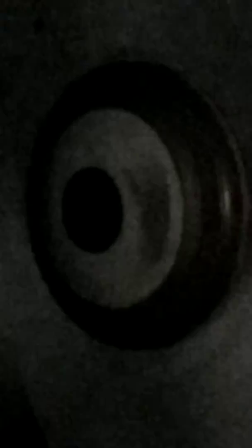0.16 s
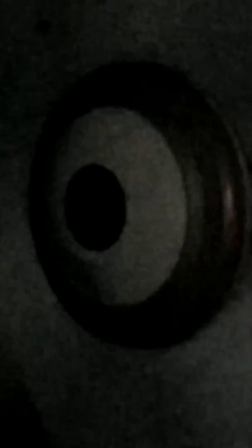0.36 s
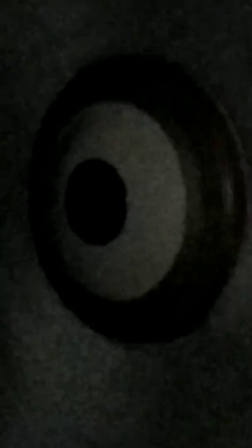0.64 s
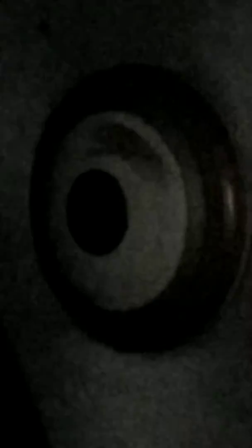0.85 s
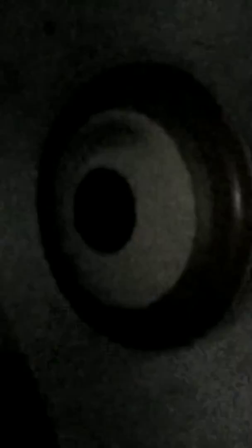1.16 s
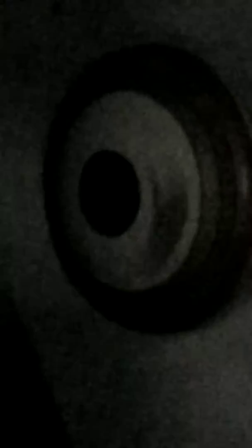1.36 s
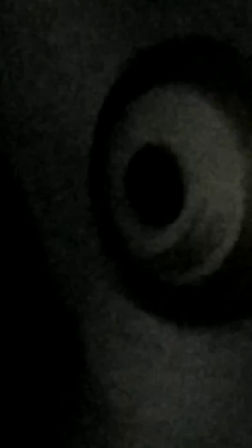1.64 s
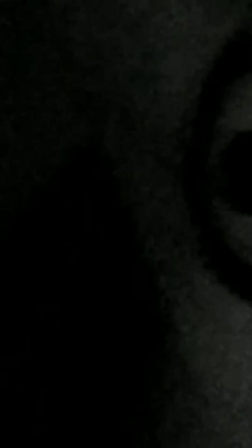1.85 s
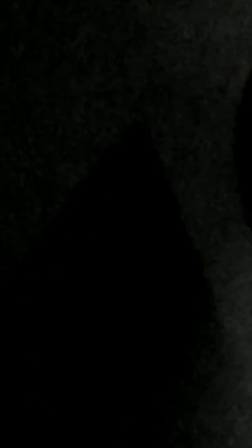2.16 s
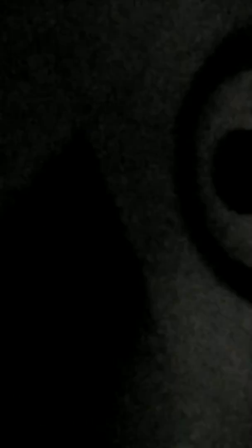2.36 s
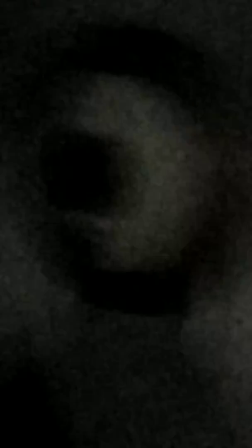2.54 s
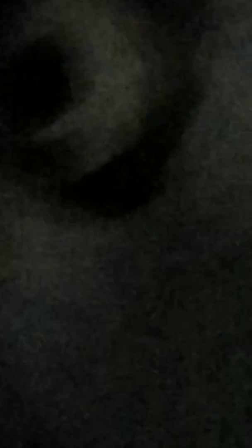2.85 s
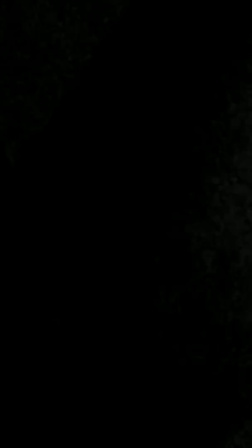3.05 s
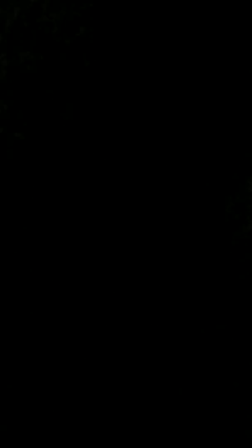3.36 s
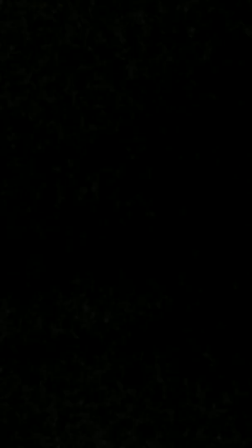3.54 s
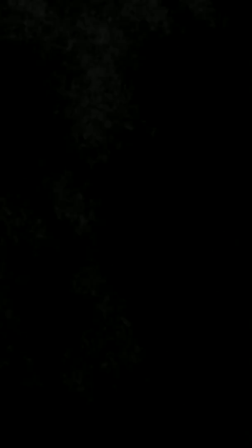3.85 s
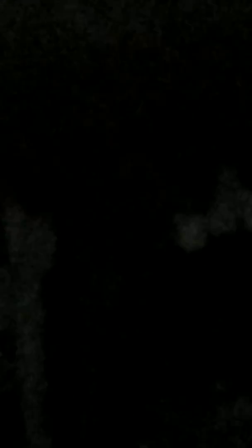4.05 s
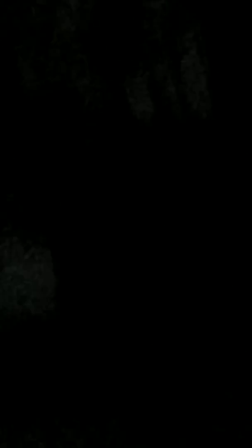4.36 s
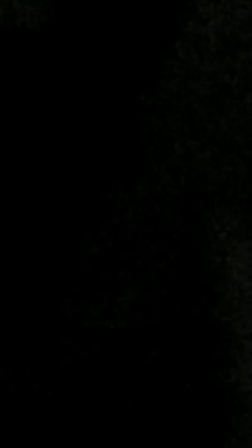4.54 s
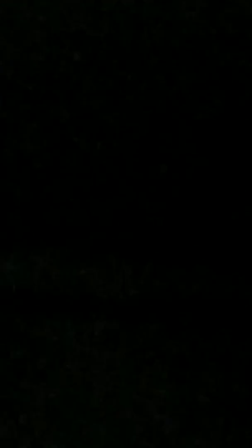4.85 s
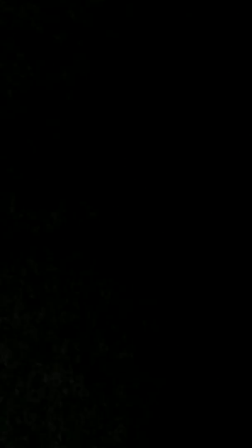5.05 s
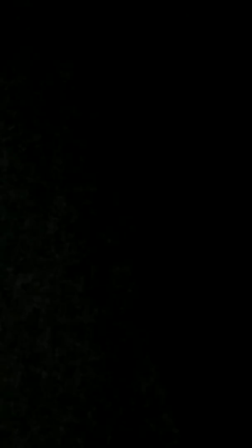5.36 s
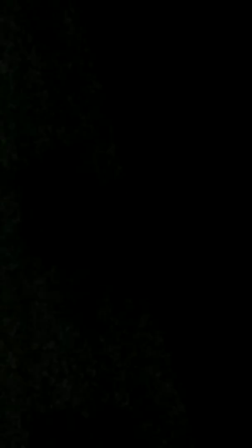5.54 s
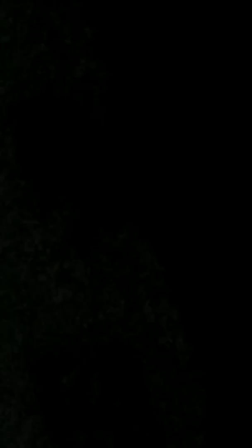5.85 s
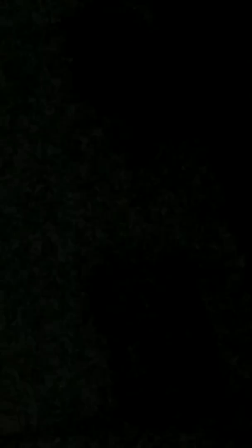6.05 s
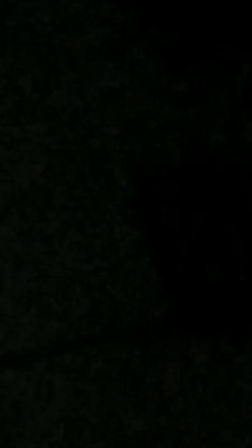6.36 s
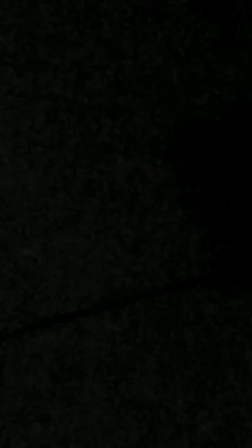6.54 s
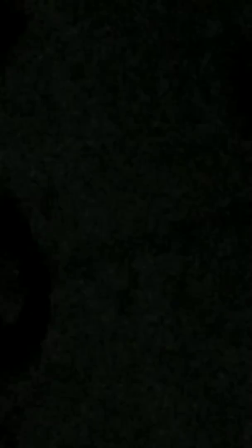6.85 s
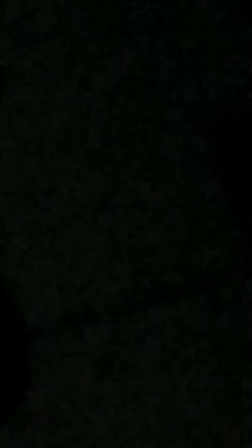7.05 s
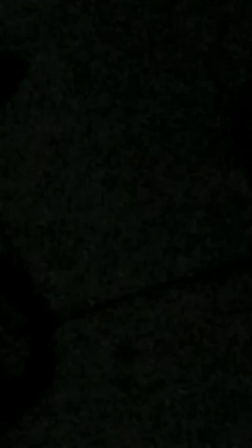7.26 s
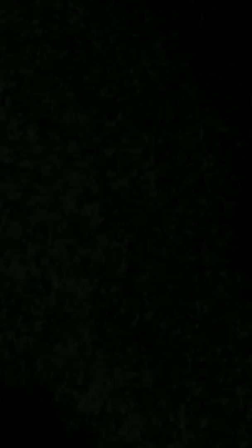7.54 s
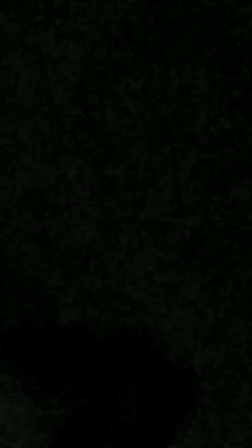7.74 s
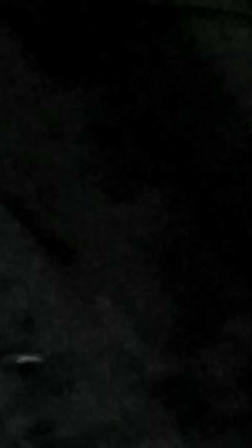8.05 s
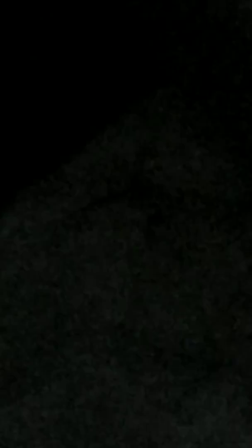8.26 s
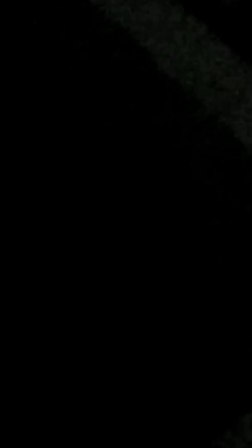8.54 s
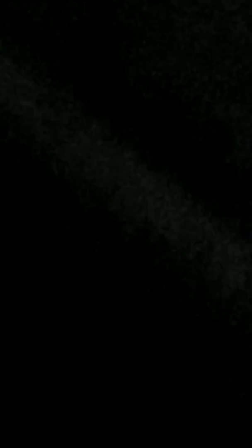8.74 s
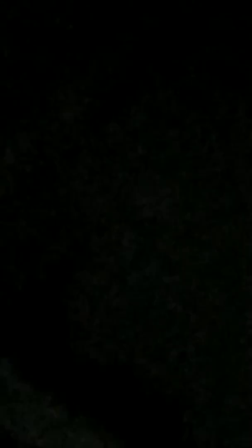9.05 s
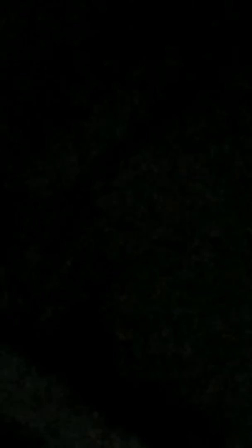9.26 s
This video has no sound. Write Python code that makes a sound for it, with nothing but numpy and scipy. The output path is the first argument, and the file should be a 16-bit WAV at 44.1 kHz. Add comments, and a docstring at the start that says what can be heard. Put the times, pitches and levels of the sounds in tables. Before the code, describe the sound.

A small electric fan whirs steadily close by in a quiet room, low and airy with a fluttering hum. The handheld phone microphone picks up thuds and finger clicks, busiest in the first three seconds with two hard snaps, then mostly muffled rumbling from a shifting grip, and a few more clicks and bumps near the end.

```python
"""An electric fan whirs in a quiet room: shaped noise for its turbulent air, over a sine at blade-passing rate.
Someone carries a phone near it; a hand fidgets, bumps and shifts its grip as low rumble and decaying sines.
Finger clicks excite case resonances with a short room tail; rubs, and soft hiss around some clicks, are
swells of band-passed noise. Narrow noises and arcing tones make faint whines. A noise suppressor holds the
treble down until a band rises out of its floor, so the hiss comes up for a moment after louder sounds."""
import sys
import numpy as np
from scipy import signal
from scipy.fft import rfft, irfft
from scipy.io import wavfile
from scipy.ndimage import uniform_filter1d

SR = 44100
rng = np.random.default_rng(int(sys.argv[2]) if len(sys.argv) > 2 else 0)


def materialize(psi):
    """Save the field psi as 16-bit PCM at rate SR to the path in sys.argv[1].

    A 1-D psi becomes a single channel; in a 2-D psi each row is a channel.
    """
    bounded = np.clip(np.atleast_2d(psi).T, -1, 1)
    quanta = np.round(bounded * 32767).astype(np.int16)
    wavfile.write(sys.argv[1], SR, quanta)


N = 414540
TIME = np.arange(N) / SR


def undb(db):
    """Decibel definition: an amplitude gain is ten to the power db / 20."""
    return 10 ** (np.asarray(db) / 20)


def unit(x):
    """Normalisation: scale to rms 1."""
    return x / np.sqrt(np.mean(x ** 2))


def curves(table):
    """Linear interpolation: each column after start_s as one value per sample."""
    start_s, *columns = np.transpose(table)
    return [np.interp(TIME, start_s, column) for column in columns]


def at_hz(points, hz):
    """Logarithmic frequency scale: read (frequency, value) points between their marks."""
    point_hz, value = np.transpose(points)
    return np.interp(np.log(np.maximum(hz, 1)), np.log(point_hz), value)


def shape(x, gain):
    """Linear filtering: multiply the spectrum by a gain given as a function of frequency."""
    return irfft(rfft(x) * gain(np.fft.rfftfreq(N, 1 / SR)), N)


def noise(colour, channels=2):
    """Coloured noise: uncorrelated white noises filtered to a given spectrum."""
    white = rng.standard_normal((channels, N))
    return unit(shape(white, lambda f: undb(at_hz(colour, f))))


def band(hz, width_hz):
    """Narrow-band noise: two uncorrelated noises around one pitch."""
    white = rng.standard_normal((2, N))
    return unit(shape(white, lambda f: 1 / (1 + ((f - hz) / width_hz) ** 2) ** 2))


def walk(rate_hz):
    """Random modulation: low-passed noise of rms 1 that wanders up to about rate_hz."""
    return unit(shape(rng.standard_normal(N), lambda f: 1 / (1 + (f / rate_hz) ** 4)))


def pan(left_minus_right_db):
    """Interchannel level difference: left and right gains with a mean of 1."""
    left = np.atleast_1d(undb(left_minus_right_db))
    return 2 * np.array([left, np.ones_like(left)]) / (1 + left)


def swell(peak_s, rise_s, fall_s):
    """Gaussian envelope: a rounded rise to 1 and a rounded fall, each with its own spread."""
    spread_s = np.where(TIME < peak_s, rise_s, fall_s)
    return np.exp(-0.5 * np.minimum(((TIME - peak_s) / spread_s) ** 2, 10 ** 2))


def add(out, start_s, sound):
    """Superposition: mix a sound in at its start time."""
    i = int(start_s * SR)
    out[:, i:i + sound.shape[-1]] += sound[..., :N - i]


# spectrum of the fan's air before its bass roll-off: frequency_hz, density_db (relative, per Hz)
AIR_COLOUR = [(35, -16), (100, -1), (135, -7), (170, -9), (230, -19), (255, -12.5), (310, -12.5),
              (355, -21), (395, -15), (540, -22), (605, -19.5), (680, -24), (900, -22), (1200, -24.5),
              (1420, -23.5), (1700, -34), (2100, -62), (3800, -120)]
# correlation of the air noise at the two microphones: frequency_hz, correlation (0-1)
AIR_LIKENESS = [(60, 0.38), (130, 0.078), (290, 0.8), (640, 0.83), (1400, 0.012), (3000, 0.25)]
# the fan as heard from the moving phone: start_s, relative_level_db, upper_gain_db, left_minus_right_db
FAN_PATH = [(0.0, -54, -10, 2), (1.18, -54.5, -0.5, 1), (1.83, -54, -6, 0.5), (2.22, -53, -4.5, 1),
            (3.14, -55.5, 1, 1), (4.34, -55.5, -1, 4.5), (4.55, -52.5, -3, 0.5), (5.47, -54.5, -2, 1.5),
            (6.54, -53, 0.5, 1), (6.94, -55.5, 0.5, 1), (7.59, -54, 0.5, 1), (9.4, -55, 3, 2.5)]
# gain of the top of the whir, which comes and goes: start_s, gain_db
WHIR_TOP = [(0, -19), (.7, 2), (.85, 0), (1.2, -9), (1.8, -16), (2.2, -4), (2.9, -5.5), (3.2, -17),
            (3.5, 11), (6.5, 5.5), (9.4, 4)]


def fan(shaft_hz=20.2, throb=0.11, blade_hz=104.1, blade_db=-53, waver_db=4.0):
    """Aerodynamic noise: turbulent air throbs once a turn over a wavering blade-passing tone."""
    flicker_db, air_db, bass_edge_hz, upper_hz, top_hz = 2.0, 7.0, 150, 900, 1500
    level_db, upper_db, pan_db = curves(FAN_PATH)
    mid, side = noise(AIR_COLOUR)
    # more mid than side where the two microphones hear alike
    mid = shape(mid, lambda f: np.sqrt(1 + np.clip(at_hz(AIR_LIKENESS, f), 0, 1)))
    side = shape(side, lambda f: np.sqrt(1 - np.clip(at_hz(AIR_LIKENESS, f), 0, 1)))
    air = np.array([mid + side, mid - side])
    air = shape(air, lambda f: 1 / np.sqrt(1 + (bass_edge_hz / (f + 1)) ** 2))
    upper = shape(air, lambda f: 1 / (1 + (upper_hz / (f + 1)) ** 4))
    upper_gain = undb(upper_db + flicker_db * walk(20.3))
    air = unit(air + upper * (upper_gain - 1)) * undb(level_db + air_db)
    top_gain_db, = curves(WHIR_TOP)
    top = shape(air, lambda f: 1 / (1 + (top_hz / (f + 1)) ** 16))
    air += top * (undb(top_gain_db) - 1)
    air += undb(-59.5) * band(730, 160)  # grille
    # phase of a slightly unsteady 1 Hz rotation, scaled to each pitch below
    turn = 2 * np.pi * np.cumsum(1 + 0.0024 * walk(2.4)) / SR
    air *= (1 + throb * np.sin(shaft_hz * turn)) * pan(pan_db)
    hum = np.sqrt(2) * np.sin(blade_hz * turn) * undb(blade_db + waver_db * walk(6.0))
    return air + hum * pan(1.5)


# spectrum of the handling rumble: frequency_hz, density_db (relative, per Hz)
RUMBLE_COLOUR = [(25, -40), (38, -7), (55, -0.5), (80, 4), (125, 3), (180, -5), (300, -20.5), (600, -69.5)]
# the hand rests lightly at first, then holds more restlessly: start_s, rumble_level_db
RESTLESS = [(0, -53), (1.9, -66), (2.3, -62.5), (3.4, -49.5), (4.3, -50.5), (5.6, -50.5), (7.2, -48),
            (9.4, -52)]
# shifts of the grip, each a short swell of rumble: peak_s, half_length_s, level_db, left_minus_right_db
GRIPS = [(0.12, 0.02, -41, 15), (0.304, 0.022, -34, 24), (2.277, 0.11, -40, 5), (3.058, 0.029, -42.5, 17.5),
         (4.24, 0.01, -37, -26), (4.37, 0.079, -37.5, 15), (4.528, 0.022, -34.5, -24),
         (4.687, 0.019, -37, -15), (5.151, 0.022, -50.5, 14), (5.256, 0.012, -37, 4),
         (6.018, 0.029, -41, 13), (6.853, 0.012, -38.5, -21.5), (7.27, 0.022, -42.5, 18),
         (7.596, 0.016, -50, 10), (7.85, 0.045, -42.5, 6), (8.277, 0.031, -44, 20), (8.78, 0.016, -38, 26),
         (9.272, 0.05, -42.5, 0)]
# soft bumps of the hand on the case: start_s, level_db, pitch_hz, t60_s, left_minus_right_db
BUMPS = [(.304, -44, 84.6, 0.038, 12), (.322, -17, 130, 0.023, 20), (0.398, -29, 112, 0.087, 13),
         (2.201, -40.5, 292, 0.033, 9), (2.209, -24.5, 114.3, 0.045, 12),
         (2.5422, -18, 297.6, 0.037, -29.5), (2.946, -25, 88, 0.043, 21), (4.509, -29.5, 83, 0.064, 5),
         (5.99, -31.5, 95, 0.086, 22), (7.211, -27.5, 97, 0.093, 21), (8.731, -17.5, 75.4, 0.032, 12),
         (8.827, -29, 95, 0.1, 15), (9.233, -21, 99, 0.055, 21), (9.273, -21.5, 84, 0.045, 18)]


def ring(hz, t60_s, length_s=0.13):
    """Damped oscillation: a sine that falls by 60 dB in t60_s."""
    t = TIME[:int(length_s * SR)]
    return np.sin(2 * np.pi * hz * t) * np.exp(-np.log(1000) * t / t60_s)


def handling(fidget_db=3.0, fidget_hz=6, apart=0.5, left_db=2.0):
    """Structure-borne sound: fidgeting and grip shifts rumble through the case, and bumps ring it."""
    rest_db, = curves(RESTLESS)
    mid, side = noise(RUMBLE_COLOUR)
    pressure = undb(rest_db + fidget_db * walk(fidget_hz)) * pan(left_db)
    for peak_s, half_s, level_db, pan_db in GRIPS:
        grip = undb(level_db) * swell(peak_s, half_s, half_s) * pan(pan_db)
        pressure = np.hypot(pressure, grip)  # unrelated sounds add in power
    out = unit(np.array([mid + apart * side, mid - apart * side])) * pressure
    for start_s, level_db, pitch_hz, t60_s, pan_db in BUMPS:
        add(out, start_s, undb(level_db) * ring(pitch_hz, t60_s) * pan(pan_db))
    return out


# spectrum of the hiss with the suppressor open: frequency_hz, density_db (relative, per Hz)
HISS_COLOUR = [(800, 5.5), (1600, 9.5), (2000, 5.5), (2700, 5), (3200, 0.5), (4300, 3), (5600, 1.5),
               (6300, 0), (7500, 0), (8500, -13), (12000, -7.5), (15500, -15.5)]
# drift of the hiss before suppression: start_s, level_db
HISS_LEVEL = [(0, -55), (2.5, -53.5), (3.6, -57.5), (4.6, -56), (5.4, -55.5), (6.6, -54), (7.4, -55),
              (9.4, -54)]


def hiss(left_db=7.0):
    """Microphone self-noise: uncorrelated coloured noise whose level drifts."""
    level_db, = curves(HISS_LEVEL)
    return undb(level_db) * noise(HISS_COLOUR) * pan(left_db)


# the motor's whine comes and goes: start_s, level_db
MOTOR_LEVEL = [(0, -75), (.35, -76), (.6, -75), (1.3, -69.5), (1.7, -76.5), (2.7, -76), (3.05, -71.5),
               (3.3, -96), (3.5, -73.5), (5, -76.5), (6.1, -70), (9.4, -71)]


def motor(hz=2228, width_hz=90, waver_db=4.0, pan_db=-14):
    """Amplitude modulation: the fan motor's thin whine is wavering narrow noise, mostly on the right."""
    level_db, = curves(MOTOR_LEVEL)
    return undb(level_db + waver_db * walk(6)) * band(hz, width_hz) * pan(pan_db)


# continuous faint electronic whines that flutter and pulse:
# pitch_hz, width_hz, level_db, flutter_db, pulse_depth (0-1), left_minus_right_db
WHINES = [(2820, 37, -88.5, 3.5, 0.2, -6.5), (3650, 70, -89, 3, 0.1, -0.5), (6700, 110, -65, 2.5, .12, 4.5),
          (6900, 240, -74.5, 2, .12, -5)]
# even runs of bursts of a higher whine, near one of two pitches: first_burst_s, last_burst_s, pitch_hz
WHINE_RUNS = [(0.15, 1.4, 10120), (0.19, .46, 9720), (1.642, 1.93, 10000), (2.247, 2.84, 10300),
              (3.093, 3.68, 9800), (3.972, 4.6, 10300), (4.907, 6.72, 9810), (6.398, 7.33, 10330),
              (7.507, 9.03, 9710), (8.416, 8.72, 10320)]


def whine(pulse_hz=12.0, burst_every_s=0.3077, burst_half_s=0.12, burst_db=-74.5, burst_pan_db=-11):
    """Amplitude and frequency modulation: low whines flutter and pulse, a high one repeats in arcs."""
    blur_hz, flutter_db, bend_hz, scatter_hz, scatter_db = 180, 2.5, -130, 55, 2
    pulse = np.sin(2 * np.pi * np.cumsum(pulse_hz * (1 + 0.17 * walk(2.4))) / SR)
    out = np.zeros((2, N))
    for hz, width_hz, level_db, waver_db, depth, pan_db in WHINES:
        gain = undb(level_db + waver_db * walk(36.0)) * (1 + depth * pulse)
        out += gain * band(hz, width_hz) * pan(pan_db)
    # a complex random envelope widens the pitch into a narrow band
    blur = (walk(blur_hz) + 1j * walk(blur_hz)) * undb(flutter_db * walk(3.3))
    for first_s, last_s, hz in WHINE_RUNS:
        for burst_s in np.arange(first_s, last_s + burst_every_s / 2, burst_every_s):
            near = np.abs(TIME - burst_s) < 2 * burst_half_s
            u = (TIME[near] - burst_s) / burst_half_s
            pitch_hz = hz + scatter_hz * rng.standard_normal() + bend_hz * u ** 2
            phase = 2 * np.pi * np.cumsum(pitch_hz) / SR
            burst = np.real(blur[near] * np.exp(1j * phase)) * np.exp(-u ** 4)
            gain = undb(burst_db + scatter_db * rng.standard_normal())
            out[:, near] += gain * burst * pan(burst_pan_db)
    return out


def minimum_phase(gain):
    """Minimum phase: folding the cepstrum gives the quickest causal response with this spectrum."""
    cepstrum = irfft(np.log(gain + 1e-9))
    half = len(cepstrum) // 2
    cepstrum[1:half] *= 2
    cepstrum[half + 1:] = 0
    return irfft(np.exp(rfft(cepstrum)))


# resonances of the phone case and microphone port: pitch_hz, undamped_width_hz, relative_level_db
CASE = [(810, 1550, 0.5), (2620, 1100, 0), (3930, 1800, 0.5), (5640, 2300, -0.5), (12400, 4500, -1)]
# finger clicks: start_s, five relative levels_db (one per case resonance),
# damping by the finger (factor on the widths), left_minus_right_db
CLICKS = [(.052, -49.5, -66, -69, -72, -81.5, 0.44, 8), (0.343, -74, -64, -78, -70, -63, 1.4, 22),
          (0.3937, -38, -46.5, -45.5, -70, -85, 0.83, 43), (0.9108, -59, -37.5, -61, -47.5, -56, 1.35, 44),
          (1.034, -72.5, -69.5, -70, -55, -59, 1.2, 25), (1.0624, -44.5, -37.5, -70, -43.5, -70, 0.74, 39),
          (1.07, -56, -52, -71, -46.5, -52, 1.2, 31), (1.6828, -47.5, -36, -64, -46.5, -57.5, 0.76, 48),
          (1.768, -74, -65.5, -68, -49.5, -68.5, 0.73, 25), (1.803, -47, -56, -69, -57.5, -58.5, .9, 27),
          (1.8406, -41, -27.5, -60.5, -20.5, -35, 0.75, 26), (1.8667, -46, -43, -62, -46.5, -43, 2, 26),
          (1.9224, -60, -34.5, -56, -41.5, -51, 0.71, 31), (2.0058, -63, -41.5, -61, -42.5, -51, 1.0, 46),
          (2.143, -63.5, -46.5, -43, -41, -43, 0.76, 40), (2.1434, -59, -37.5, -38, -38.5, -48, 0.95, 50),
          (2.1999, -30, -26, -30.5, -22.5, -28, 1.6, 22), (2.2143, -57, -56, -53, -37.5, -35, 1.3, 24),
          (2.5394, -23.5, -28.5, -33, -31, -24.5, 1.8, 10), (2.5406, -30.5, -27, -27, -14, -24, 1.2, 14.5),
          (2.9362, -64, -51.5, -67, -39.5, -46.5, 1.5, 40), (3.189, -59, -42.5, -71.5, -48, -88, 0.36, 22),
          (6.466, -87, -69, -56.5, -54, -65.5, 0.57, 7), (7.7533, -50, -54, -51, -49, -63, 0.93, 7.5),
          (7.758, -38, -47, -38.5, -31.5, -42.5, 0.55, 41), (8.1495, -50, -59, -58, -56, -64, .9, 14),
          (8.1567, -39, -47, -43, -35.5, -52.5, 0.52, 38), (9.232, -70, -52, -51, -46.5, -45, 2.18, 35)]


def clicks(crunch=0.11, crunch_s=0.0012):
    """Impulse excitation: a snap and its crunch ring the case, more briefly where the finger damps it."""
    out = np.zeros((2, N))
    t = TIME[:SR // 200]
    f = np.fft.rfftfreq(1024, 1 / SR) + 1
    grits = rng.standard_normal((len(CLICKS), len(t)))
    for (start_s, *levels_db, damping, pan_db), grit in zip(CLICKS, grits):
        contact = crunch * grit * np.exp(-t / crunch_s)
        contact[0] += 1  # the snap
        power = np.zeros(len(f))
        for (hz, width_hz, case_db), level_db in zip(CASE, levels_db):
            resonance = 1 / (1 + ((f - hz ** 2 / f) / (width_hz * damping)) ** 2)
            power += (undb(level_db + case_db) * unit(resonance)) ** 2
        click = np.convolve(unit(contact), minimum_phase(np.sqrt(power)))
        add(out, start_s, click * pan(pan_db))
    return out


def room(x, t60_s=0.84, wet_db=-28, gap_s=0.0016):
    """Diffuse reverberation: convolve with a short decaying noise that builds up over about gap_s."""
    t = TIME[:SR // 2]
    decay = np.exp(-np.log(1000) * t / t60_s) * (1 - np.exp(-t / gap_s))
    tail = rng.standard_normal((2, len(t))) * decay
    tail /= np.sqrt(np.sum(tail ** 2, axis=1, keepdims=True))
    return x + undb(wet_db) * signal.fftconvolve(x.mean(axis=0, keepdims=True), tail, axes=1)[:, :N]


# finger rubs, and soft swells of hiss around some clicks:
# peak_s, rise_s, fall_s, level_db (before the band filter), low_edge_hz, top_edge_hz
RUBS_AND_SWELLS = [(0.471, 0.027, 0.081, -56.5, 2040, 14000), (0.798, 0.026, 0.023, -52, 3980, 6000),
                   (.79, .05, 0.04, -54.5, 2580, 12500), (1.06, 0.055, 0.097, -54, 4850, 14200),
                   (1.575, 0.09, 0.06, -53.5, 5400, 6850), (1.575, 0.06, .05, -53.5, 2510, 10630),
                   (1.752, 0.018, 0.0058, -45, 5000, 12600), (1.822, 0.011, 0.017, -46, 6030, 15500),
                   (2.177, 0.028, 0.017, -43.5, 1800, 13000), (2.212, 0.0031, 0.0049, -25, 5900, 15500),
                   (2.237, 0.0067, 0.012, -47, 4500, 15000), (2.315, 0.022, 0.019, -42.5, 5400, 15530),
                   (2.40, 0.045, 0.032, -57.5, 2990, 12050), (2.545, 0.0023, .004, -43.5, 1500, 15080),
                   (2.661, 0.044, 0.066, -62, 2241, 11870), (2.827, 0.022, 0.036, -52, 4300, 13030),
                   (3.2, .006, 0.078, -58, 2360, 2900), (3.21, 0.013, .055, -58, 5350, 5985),
                   (4.13, 0.023, 0.023, -55.5, 10360, 15560), (5.791, 0.051, .03, -60.5, 11000, 15570),
                   (6.18, 0.052, 0.035, -59.5, 8030, 14850), (7.835, 0.017, 0.015, -54.5, 3000, 13200),
                   (8.228, 0.012, 0.012, -63.5, 3500, 13000), (8.73, 0.023, 0.033, -58.5, 11000, 15500),
                   (8.93, 0.06, 0.15, -60.5, 3630, 14610), (9.19, 0.033, 0.03, -48.5, 4570, 11300),
                   (9.222, 0.017, 0.014, -42, 5640, 12040), (9.31, 0.036, 0.037, -53.5, 3870, 13900)]
# spectrum shared by the rubs and hiss swells: frequency_hz, density_db (relative, per Hz)
RUB_COLOUR = [(1000, -8.5), (2000, -6), (2800, 4.5), (4300, -4.5), (5800, -1.5), (7200, -2), (9000, -13.5),
              (13000, -9.5), (16000, -13)]


def rubs_and_swells(grain_db=2.0, catch_db=4.0, catch_hz=55, left_db=17):
    """Stick-slip friction: grainy noise with odd snags, fluttering by octave, for rubs and hiss swells."""
    snags_per_s, snag_db, snag_spread_db = 170, -7, 3
    out = np.zeros((2, N))
    snag_gain = undb(snag_spread_db * np.clip(rng.standard_normal(N), -2, 2))
    snags = (rng.random(N) < snags_per_s / SR) * snag_gain
    snags = unit(shape(snags, lambda f: undb(at_hz(RUB_COLOUR, f))))
    grains = noise(RUB_COLOUR) * undb(grain_db * walk(400)) + undb(snag_db) * snags
    slips = np.zeros((2, N))
    for hz in 1000 * 2 ** np.arange(5):
        octave = shape(grains, lambda f: np.maximum(1 - np.abs(np.log2((f + 1) / hz)), 0))
        slips += octave * undb(catch_db * walk(catch_hz))
    slips = unit(slips)
    for peak_s, rise_s, fall_s, level_db, low_hz, top_hz in RUBS_AND_SWELLS:
        edges_hz = np.clip([low_hz, max(top_hz, low_hz + 100)], 100, 0.45 * SR)
        band_pass = signal.butter(2, edges_hz, "band", fs=SR, output="sos")
        out += undb(level_db) * swell(peak_s, rise_s, fall_s) * signal.sosfilt(band_pass, slips)
    return out * pan(left_db)


def scene():
    """Superposition: fan, hand, microphone hiss, clicks in the room, rubs and hiss swells add up."""
    return fan() + handling() + hiss() + room(clicks()) + rubs_and_swells()


def suppress(x, split_hz=1620, closed_db=-24.0, patchy_db=7.5, release_db_per_s=170, fade_db_per_s=125):
    """Spectral gating: each treble band stays down until it rises out of its floor, then closes slowly."""
    margin_db, knee_db, link, ceiling_db, opening_share = 4.5, 1.65, 0.21, 19, 0.87
    hz, s, spectrum = signal.stft(x, SR, nperseg=512)
    power = uniform_filter1d(np.abs(spectrum) ** 2, size=15, axis=1)
    # each channel also listens a little to the other
    db = 10 * np.log10(np.abs(power + link * power[::-1]) + 1e-18)
    over_db = db - np.median(db, axis=2, keepdims=True)
    # loud hits hold it open only a little longer
    over_db -= (1 - opening_share) * np.maximum(over_db - ceiling_db, 0)
    release = release_db_per_s * s
    held_db = np.maximum.accumulate(over_db + release, axis=2) - release
    patches = uniform_filter1d(rng.standard_normal(db[:1].shape), size=12, axis=2)
    patches = unit(uniform_filter1d(patches, size=3, axis=1))
    shut = 1 / (1 + np.exp(np.minimum((held_db - margin_db) / knee_db, 20)))
    cut_db = shut * (closed_db + patchy_db * patches)
    # the gain opens at once but falls no faster than the fade
    fading = fade_db_per_s * s
    cut_db = np.maximum.accumulate(cut_db + fading, axis=2) - fading
    treble = 1 - 1 / (1 + (hz[:, None] / split_hz) ** 14)
    return signal.istft(spectrum * undb(cut_db * treble), SR)[1][:, :N]


def record(dry, low_cut_hz=48, top_hz=15900):
    """Band limiting: the phone gates the scene, passes both whines whole, cuts deep bass, clips, cuts the top."""
    sound = suppress(dry) + whine() + motor()
    high_pass = signal.butter(5, low_cut_hz, "high", fs=SR, output="sos")
    sound = np.clip(signal.sosfilt(high_pass, sound), -1, 1)
    low_pass = signal.ellip(8, 0.2, 70, top_hz, fs=SR, output="sos")
    return signal.sosfilt(low_pass, sound)


dry = scene()
out = record(dry)
materialize(out)
```